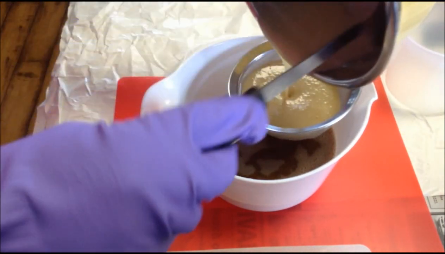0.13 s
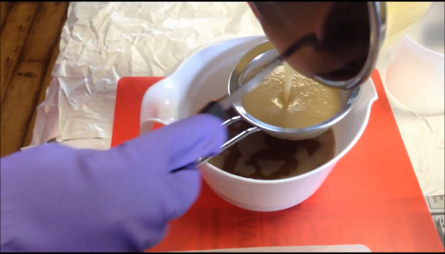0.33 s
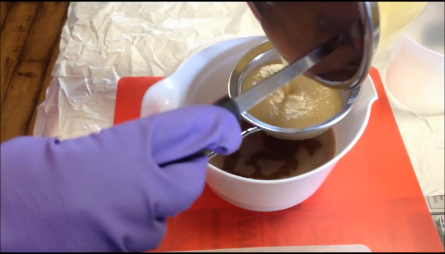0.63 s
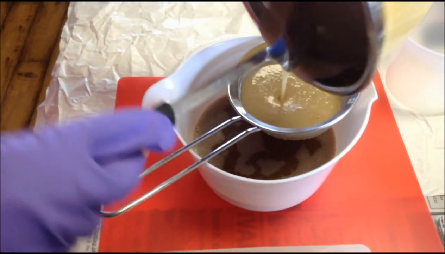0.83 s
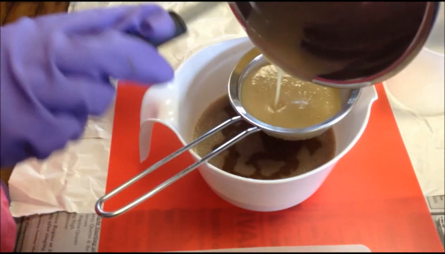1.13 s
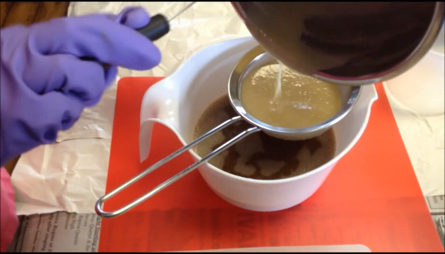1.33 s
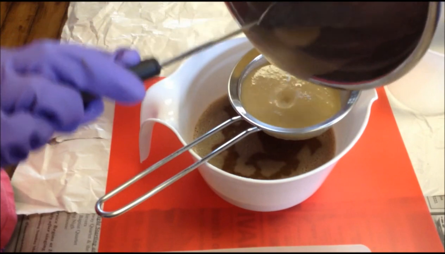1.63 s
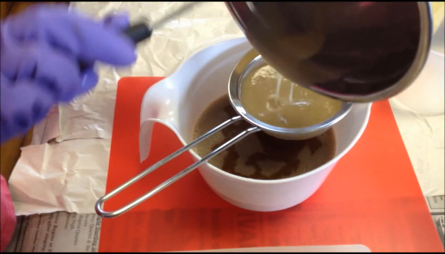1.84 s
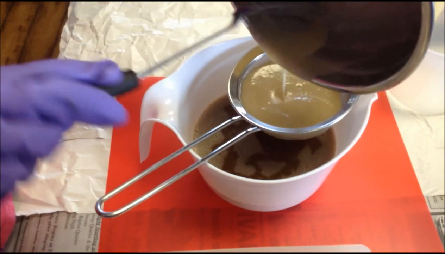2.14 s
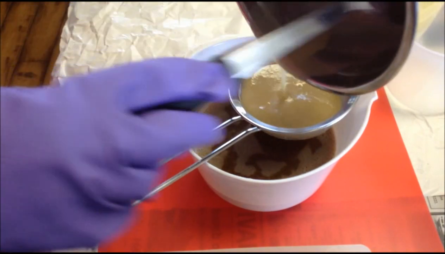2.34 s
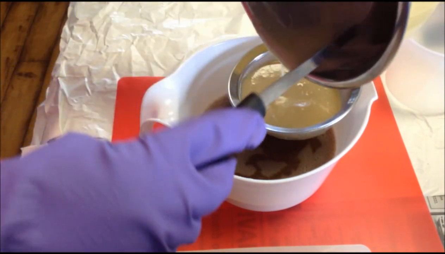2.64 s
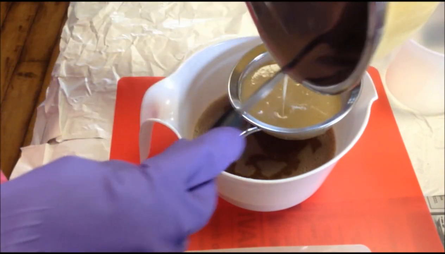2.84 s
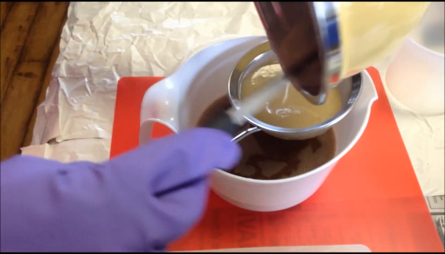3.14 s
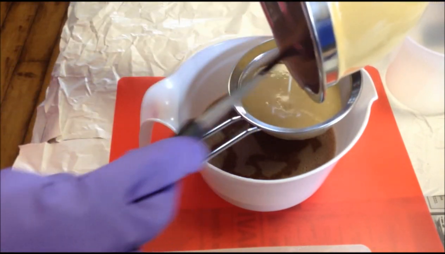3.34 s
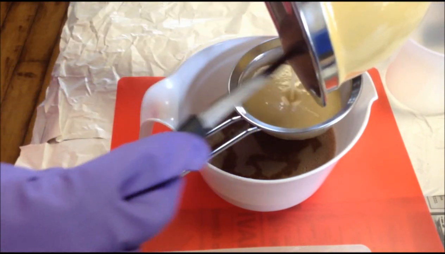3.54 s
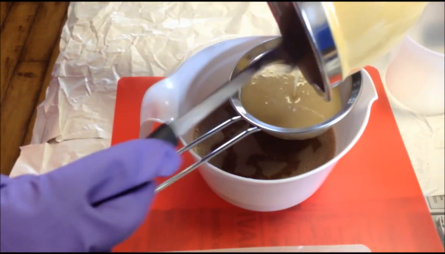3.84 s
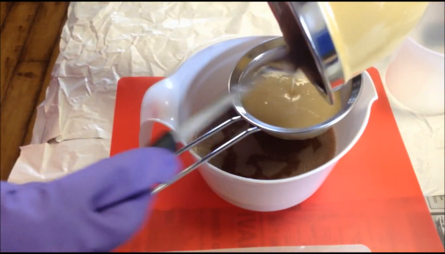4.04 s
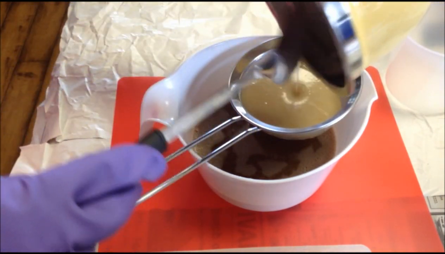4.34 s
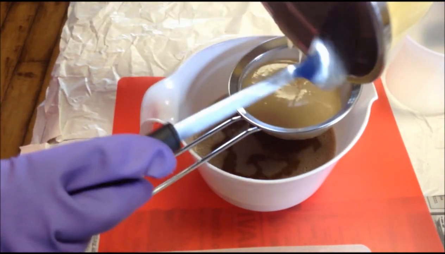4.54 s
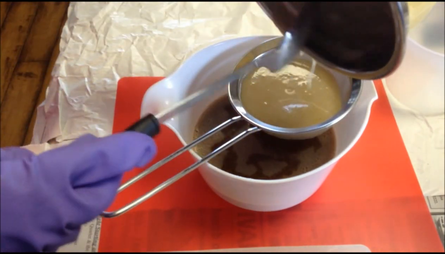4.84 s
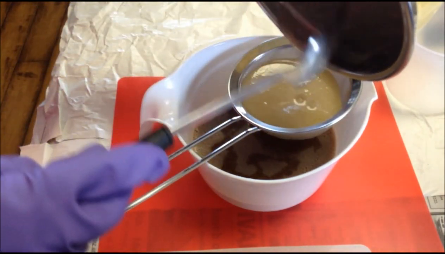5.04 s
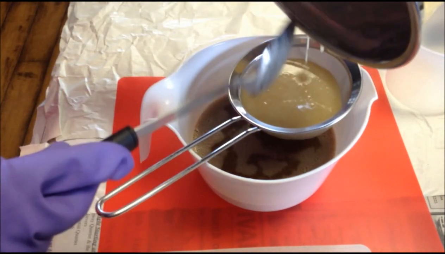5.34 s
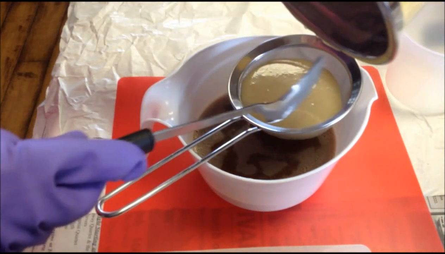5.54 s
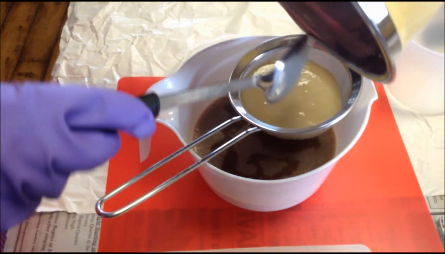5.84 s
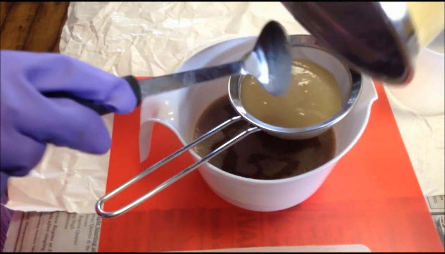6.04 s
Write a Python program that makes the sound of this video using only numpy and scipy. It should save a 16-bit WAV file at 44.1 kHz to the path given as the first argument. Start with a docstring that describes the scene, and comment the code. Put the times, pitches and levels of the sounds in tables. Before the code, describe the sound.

A metal ladle works against the wall of a small pan: hard clunks with a short hollow ring, each often followed by a dry, hissing rasp. The start is sparse, with tiny ticks around one second; later strokes are brisker and louder, ending in a clustered clatter and a last scrape. Close microphone, short indoor echo, faint steady low murmur.

```python
"""A steel ladle scrapes thick liquid out of a tilted steel pan, over a strainer in a small kitchen.
Knocks, and a few faint ticks or drips near 1 s, excite clear modes that ring as decaying sines
and crowded modes that sound as filtered noise.
Strokes of the edge slide and hiss through the same clear modes, driven by dense random clicks of friction.
The room adds a brief echo of decaying noise; a low steady background of shaped noise lies underneath."""
import sys
import numpy as np
from scipy import signal
from scipy.fft import rfft, irfft
from scipy.io import wavfile

SR = 44100
rng = np.random.default_rng(int(sys.argv[2]) if len(sys.argv) > 2 else 0)


def generate_wav(sig):
    """Save sig (samples, or channels by samples) to the path in sys.argv[1] as 16-bit PCM at SR."""
    pcm = np.round(np.clip(np.atleast_2d(sig).T, -1, 1) * 32767).astype(np.int16)
    wavfile.write(sys.argv[1], SR, pcm)


N = 272979

# Spectrum shape of the background noise: (frequency [Hz], relative density [dB per Hz])
MURMUR_SHAPE = [(29, -68), (50, -42), (252, -3.5), (532, -11), (863, -16), (950, -19.5), (1740, -24),
                (2060, -30.5), (2270, -27.5), (6390, -29.5), (14500, -32), (16000, -44.5)]
# Decay of the room's echo: (frequency [Hz], t60 [s])
ROOM_DECAY = [(200, 0.26), (2000, 0.78), (14000, 0.34)]
# Strokes of the sliding edge: (touch [s], lift [s], hiss at touch [dB], hiss at lift [dB],
# wall rumble at touch [dB], wall rumble at lift [dB])
SLIDE_STROKES = [(0.0, 0.386, -42, -44.5, -49.5, -54), (0.663, 0.839, -43, -44, -49, -56),
                 (1.342, 1.62, -49, -43.5, -51, -62.5), (1.836, 1.987, -39, -40.5, -53.5, -69),
                 (2.088, 2.178, -25.5, -50.5, -29, -57.5), (2.459, 3.014, -38, -41.5, -45.5, -60),
                 (3.234, 3.464, -48, -44, -45, -52.5), (3.655, 3.82, -41, -37.5, -45.5, -49.5),
                 (3.994, 4.12, -40.5, -31, -42, -49.5), (4.274, 4.382, -31, -39.5, -45.5, -54),
                 (4.617, 4.882, -43.5, -43, -50.5, -55), (5.095, 5.319, -32.5, -36.5, -36.5, -50.5),
                 (5.736, 5.968, -38.5, -49.5, -63.5, -75)]
# Moments when the edge digs in: (time [s], hiss [dB], wall rumble [dB], width [s])
DIG_SURGES = [(0.072, -30.5, -45, 0.01), (0.379, -38.5, -45.5, 0.026), (1.51, -41, -45, .06),
              (2.955, -57.5, -41.5, 0.032), (3.36, -40, -51, 0.024), (3.455, -41, -56, 0.016),
              (4.805, -36.5, -51.5, .02), (4.945, -42, -57.5, 0.023), (5.299, -46, -40, 0.016)]
# Where sliding passes from rumble to hiss: frequency of all rumble, of all hiss [Hz]
RUMBLE_HISS_HZ = [1300, 7000]
# Knocks of the ladle, and a few faint ticks or drips near 1 s: (time [s], tick [dB], clang [dB],
# thump [dB], thud [dB], bell tone [dB], lead of the upper bell mode over the lower [dB],
# how freely the upper modes ring on [dB])
KNOCKS_AND_TICKS = [(0.0044, -62, -44.5, -56, -68, -33, 11, 1), (0.0662, -34, -45, -54, -56, -41, 11, 2),
                    (0.4609, -45, -57, -74, -72, -66, 1, -7), (0.636, -52, -32, -50, -52, -58, 5, -8),
                    (0.6499, -15, -24, -20.5, -23, -34.5, 11, -8.5),
                    (0.979, -43, -43.5, -34, -48, -67, 17, -11), (1.015, -52, -52, -47, -54, -65, 5, -8),
                    (1.0533, -42.5, -40.5, -39, -55, -69, 0, -16),
                    (1.2661, -28.5, -25.5, -30.5, -47, -26, 27, 0),
                    (1.3327, -25.5, -30.5, -24.5, -21.5, -30.5, -12, 5.5),
                    (1.8317, -10.5, -26, -13.5, -17.5, -25, -12, -4.5),
                    (1.9851, -37, -29.5, -52, -55, -59, 2, -4.5),
                    (2.081, -9.5, -14.5, -19.5, -18.5, -46.5, -22.5, -5.5),
                    (2.4172, -17.5, -24.5, -17.5, -30, -24.5, 3.5, -5),
                    (2.4532, -22, -32, -23, -21, -15.5, 17, -8), (3.2096, -25, -33, -19, -20.5, -27, 1, -1),
                    (3.645, -18, -32, -20, -21.5, -34.5, 5, 1),
                    (3.817, -26.5, -29.5, -25.5, -33.5, -42, -7.5, -6.5),
                    (3.9851, -16.5, -18.5, -27, -22, -40, -5, -0.5),
                    (4.1207, -22, -29, -21, -27.5, -36.5, 3, -2),
                    (4.2719, -9, -11.5, -24, -20, -37.5, 6, -3.5),
                    (4.6111, -11.5, -16, -19, -33, -36.5, 0.5, -9.5),
                    (4.9315, -42, -37, -56, -44.5, -64, -9.5, -3.5),
                    (5.0989, -7, -16, -17, -24, -38, 6.5, -7),
                    (5.6965, -9.5, -23, -28.5, -17.5, -16, -2, -2),
                    (5.7219, -20.5, -23.5, -28, -31.5, -27, 11.5, -10),
                    (5.732, -17.5, -32, -45.5, -26, -34.5, -12, -12)]
# Where the parts of each impact lie: thud, lower bell, upper bell, thump, clang, tick [Hz]
IMPACT_PART_HZ = [270, 524, 560, 1300, 3200, 7000]
# Modes too close to tell apart, as impacts drive them: (frequency [Hz], level [dB])
CROWD_LEVELS = [(130, -22.5), (280, -9), (600, -4), (950, -4.5), (1330, 2), (1850, -7), (2400, -1),
                (3400, -3.5), (4300, 1.5), (5650, -2), (6600, 4.5), (9000, 0.5), (12000, -2), (15500, -1)]
# Decay of those crowded modes: (frequency [Hz], t60 [s])
CROWD_DECAY = [(200, 0.064), (600, 0.19), (3000, 0.16), (8000, 0.11), (15000, 0.099)]
# The same crowded modes as the sliding edge drives them: (frequency [Hz], level [dB])
RASP_LEVELS = [(200, -20), (600, -15.5), (1000, -11.5), (1330, 4.5), (1800, -12.5), (3200, -7.5),
               (4200, -10.5), (5000, -6), (5650, -7), (6500, -4.5), (8500, -1), (10500, -4), (12500, -6),
               (15000, -0.5)]
# Clear modes of pan and ladle: (frequency [Hz], level [dB], t60 [s])
PAN_MODES = [(211.5, -7, 0.039), (299.5, -2.5, 0.09), (417, 8, 0.021), (518.6, 4, 0.18), (550, -5.5, 0.36),
             (577.2, -5, 0.14), (748, -12.5, 0.19), (1049, 0.5, 0.015), (1259, -4.5, 0.098),
             (1404, -11.5, 0.061), (1717, -27.5, 0.48), (1984, -22.5, 0.18), (2025, -17.5, 0.28),
             (2393, -15.5, 0.11), (2658, -17.5, 0.2), (3070, -15, 0.1), (3180, -22, 0.067),
             (3750, -19, 0.27), (3948, -8.5, 0.044), (4310, -15, 0.12), (4900, -14.5, 0.14),
             (5150, -15, 0.083), (6200, -23.5, 0.15), (6444, -5, 0.018), (6940, -14.5, 0.091),
             (7800, -12.5, 0.12), (8240, -14, 0.088), (8340, -8, 0.1), (8960, -11.5, 0.11),
             (11200, -20, 0.036)]
# Range of the pair of modes that squawks under the edge: lower limit, upper limit [Hz]
SQUAWK_RANGE_HZ = (1200, 1500)

MURMUR_DB, ROOM_DB = -58, -11   # background rms; echo relative to the pan
LIFT_DB_PER_S = 548.5   # fall of the sliding sound once the edge leaves the wall
PAN_LOW_HZ = 145.3   # a small pan sends out no deep bass
# Grip, tilt and clinging liquid pull each mode a little
WANDER_SHARE, WANDER_HZ = 0.008, 1.5   # spread as a share of pitch, corner of the drift
STEADY_WANDER = 0.29   # the lowest modes wander by this share of the rest
RUB_BELL_DB, RUB_SQUAWK_DB = -3, 5.5   # the edge drives the lowest modes less, the squawking pair more


def from_db(db):
    """Level as logarithm of amplitude: twenty decibels make a factor of ten."""
    return 10 ** (np.asarray(db) / 20)


def rms_one(x):
    """Normalization by mean power: scale to unit rms."""
    return x / np.sqrt(np.mean(x ** 2) + 1e-20)


def at_hz(points, hz):
    """Logarithmic frequency scale: interpolate a table of (frequency [Hz], value)."""
    table_hz, values = np.array(points).T
    return np.interp(np.log(hz), np.log(table_hz), values)


def drift(corner_hz):
    """Low-pass filtered randomness: noise through a double pole wanders slowly, with rms 1."""
    step = 40   # samples between computed points
    pole = np.exp(-2 * np.pi * corner_hz * step / SR)
    white = rng.standard_normal(N // step + 2002)
    slow = signal.lfilter([1], [1, -2 * pole, pole * pole], white)[2000:]   # skip the filter's start
    return np.interp(np.arange(N) / step, np.arange(len(slow)), rms_one(slow))


def bands(count=42):
    """Constant relative bandwidth: sixth-octave band-pass filters with their centres."""
    edges = np.geomspace(125, 16500, count + 1)
    filters = []
    for low, high in zip(edges, edges[1:]):
        sos = signal.butter(2, [low, high], "band", fs=SR, output="sos")
        filters.append((np.sqrt(low * high), sos))
    return filters


def decay_pole(t60):
    """Exponential decay: the factor per sample that loses 60 dB in t60 seconds."""
    return from_db(-60 / (t60 * SR))


def murmur():
    """Spectral shaping: steady background noise is white noise weighted in frequency."""
    hz = np.maximum(np.arange(N // 2 + 1) * SR / N, 1)
    spectrum = rfft(rng.standard_normal(N)) * from_db(at_hz(MURMUR_SHAPE, hz))
    return from_db(MURMUR_DB) * rms_one(irfft(spectrum, N))


def kitchen(x, first_s=0.00098):
    """Reverberation by convolution: dense echoes act as noise that dies away band by band."""
    t = np.arange(SR // 2) / SR
    white = rng.standard_normal((2, len(t)))
    echo = np.zeros(len(t))
    for k, (hz, sos) in enumerate(bands()):
        decay = from_db(-60 * t / at_hz(ROOM_DECAY, hz))
        echo += signal.sosfilt(sos, white[k % 2] * decay)
    echo *= np.clip(t / first_s - 1, 0, 1)   # silent until the first wall answers
    return signal.fftconvolve(x, echo / np.sqrt(np.sum(echo ** 2)))[:N]


def slide_levels():
    """Addition of powers: hiss and rumble [dB] glide from touch to lift, with surges on top."""
    t = np.arange(N) / SR
    power = np.full((2, N), 1e-15)
    for touch, lift, *ends in SLIDE_STROKES:
        glide = np.array([np.interp(t, [touch, lift], pair) for pair in np.reshape(ends, (2, 2))])
        release_db = LIFT_DB_PER_S * np.maximum(t - lift, 0)
        power += (t >= touch) * from_db(glide - release_db) ** 2
    for s, hiss_db, rumble_db, width in DIG_SURGES:
        power += from_db([[hiss_db], [rumble_db]]) ** 2 * np.exp(-((t - s) / width) ** 2)
    return 10 * np.log10(power)


def slide_gain(hz, levels):
    """Frequency-dependent drive: the edge's force passes from rumble below to hiss above."""
    hiss_db, rumble_db = levels
    share = np.interp(np.log(hz), np.log(RUMBLE_HISS_HZ), [0, 1])
    return from_db(share * hiss_db + (1 - share) * rumble_db)


def friction(per_s, spread_db):
    """Friction as random impulses: the edge catches on scratches in dense uneven clicks, rms 1."""
    size_db = spread_db * np.minimum(rng.exponential(1, N), 4)
    sizes = from_db(size_db) * rng.choice([-1, 1], N)
    return rms_one(sizes * (rng.random(N) < per_s / SR))


def impact_clicks(hz, extra_db, used=slice(None)):
    """Impulsive excitation: one click per knock or tick, as strong as it is at this frequency."""
    s, tick, clang, thump, thud, bell, lead, _ = np.transpose(KNOCKS_AND_TICKS)
    strengths = np.transpose([thud, bell - lead / 2, bell + lead / 2, thump, clang, tick])
    part_log_hz = np.log(IMPACT_PART_HZ)[used]
    reach_db = np.array([np.interp(np.log(hz), part_log_hz, row[used]) for row in strengths])
    clicks = np.zeros(N)
    clicks[np.round(s * SR).astype(int)] = from_db(reach_db + extra_db)
    return clicks


def dying(clicks, t60):
    """Exponential damping: an envelope jumps at each click and falls 60 dB in t60."""
    return signal.lfilter([1], [1, -decay_pole(t60)], clicks + 1e-18)


def clatter(grit, levels, crack_t60=.03, crack_db=1.5, tail_db=-9, slide_db=1.5, patchy_db=3.5, colour_db=2.5):
    """Modal overlap: crowded modes sound as noise, a crack and wash at impacts, a rasp in sliding."""
    white = rng.standard_normal((2, N))
    filters = bands()
    colour = colour_db * rng.standard_normal((len(KNOCKS_AND_TICKS), len(filters)))   # no two alike
    out = 0
    for k, (hz, sos) in enumerate(filters):
        # the two bell strengths belong to the clear modes alone
        clicks = impact_clicks(hz, colour[:, k], used=[0, 3, 4, 5])
        crack = from_db(crack_db) * dying(clicks, crack_t60)
        wash = from_db(tail_db) * dying(clicks, at_hz(CROWD_DECAY, hz))
        struck = from_db(at_hz(CROWD_LEVELS, hz)) * (crack + wash) * white[k % 2]
        # the travelling edge favours now these modes, now those, the short waves most
        share = np.interp(np.log(hz), np.log(RUMBLE_HISS_HZ), [.3, 1])
        rasp_db = at_hz(RASP_LEVELS, hz) + slide_db + share * patchy_db * drift(5.5)
        rasp = from_db(rasp_db) * slide_gain(hz, levels) * grit
        equal_power = np.sqrt(5000 / hz)   # offsets the wider bands higher up
        out = out + (-1) ** k * signal.sosfilt(sos, (struck + rasp) * equal_power)
    return out


def ring(force, hz, t60):
    """Damped resonance: a unit click starts a sine of height 1, whose pitch may wander in time."""
    turn = np.exp(2j * np.pi * np.cumsum(hz) / SR)
    unturned = signal.lfilter([1], [1, -decay_pole(t60)], (force + 1e-18) / turn)
    return (turn * unturned).imag


def clear_ring(grit, levels, chance_db=4.5, impact_db=-1, slide_db=-35, streak_db=2.5):
    """Modal superposition: impacts and friction drive the clear modes, which add up."""
    # each impact reaches each upper mode a little differently
    chance = chance_db * rng.standard_normal((len(KNOCKS_AND_TICKS), len(PAN_MODES)))
    free_db = np.array(KNOCKS_AND_TICKS)[:, -1]
    out = 0
    for k, (hz, level_db, t60) in enumerate(PAN_MODES):
        steady = hz < 700   # the few lowest modes answer every impact alike
        rub_db, wander = 0, WANDER_SHARE
        if steady:
            rub_db, wander = RUB_BELL_DB, WANDER_SHARE * STEADY_WANDER
        elif SQUAWK_RANGE_HZ[0] < hz < SQUAWK_RANGE_HZ[1]:
            rub_db = RUB_SQUAWK_DB
        struck = impact_clicks(hz, impact_db + (0 if steady else free_db + chance[:, k]))
        streak = streak_db * drift(1.4)   # modes sing in turn along the path
        rubbed = from_db(slide_db + rub_db + streak) * slide_gain(hz, levels) * grit
        pitch_hz = hz * (1 + wander * drift(WANDER_HZ))
        out = out + (-1) ** k * from_db(level_db) * ring(struck + rubbed, pitch_hz, t60)
    return out


def scene():
    """Superposition of sound fields: the pan, its echo in the room and the background."""
    judder = from_db(2.42 * drift(22.0))   # the edge grips and slips
    grit = judder * friction(per_s=9000, spread_db=2.5)
    levels = slide_levels()
    pan = clear_ring(grit, levels) + clatter(grit, levels)
    pan = signal.sosfilt(signal.butter(2, PAN_LOW_HZ, "high", fs=SR, output="sos"), pan)
    return (pan + from_db(ROOM_DB) * kitchen(pan) + murmur())[None]


def record(dry):
    """Band limitation: two low-pass filters in turn end the treble, then peaks are clipped."""
    gentle = signal.cheby2(8, 25, 15600, fs=SR, output="sos")   # 25 dB down from 15600 Hz
    steep = signal.cheby2(12, 60, 16600, fs=SR, output="sos")   # 60 dB down from 16600 Hz
    return np.clip(signal.sosfilt(steep, signal.sosfilt(gentle, dry)), -1, 1)


dry = scene()
out = record(dry)
generate_wav(out)
```